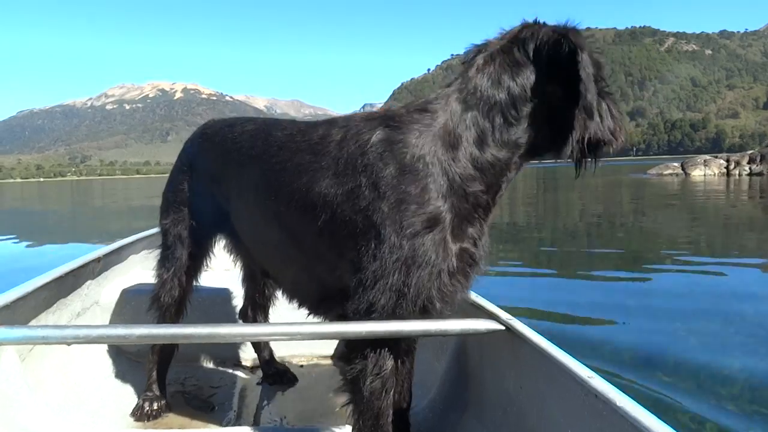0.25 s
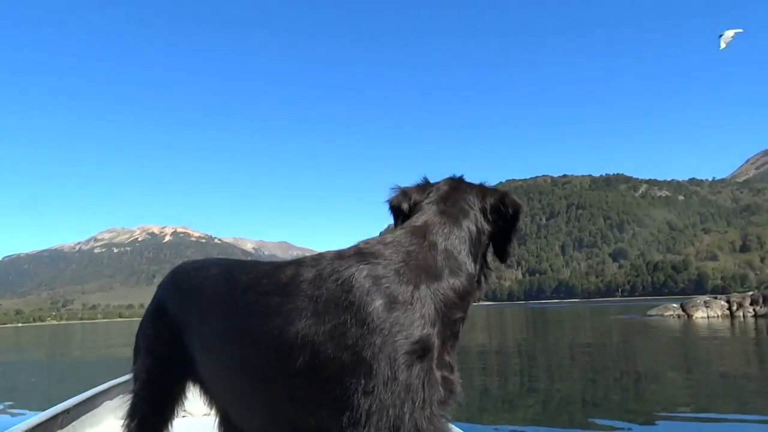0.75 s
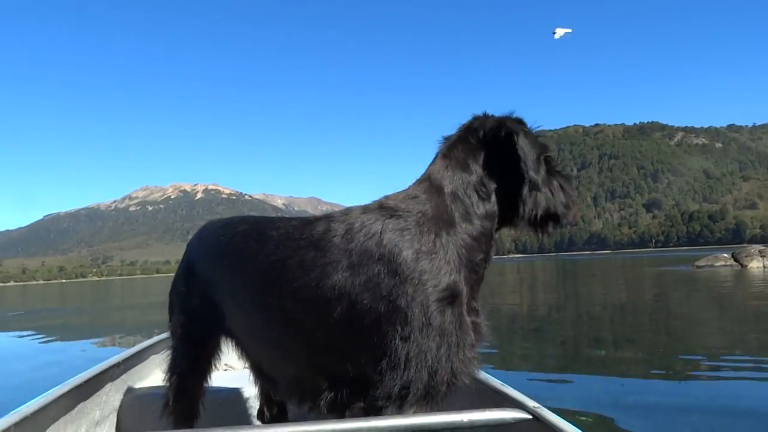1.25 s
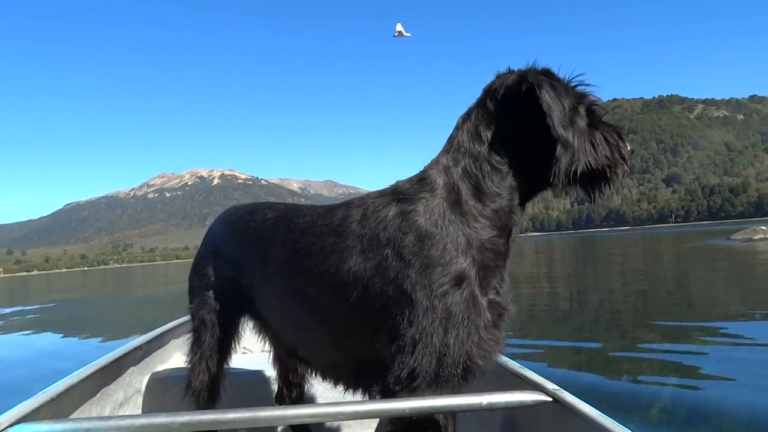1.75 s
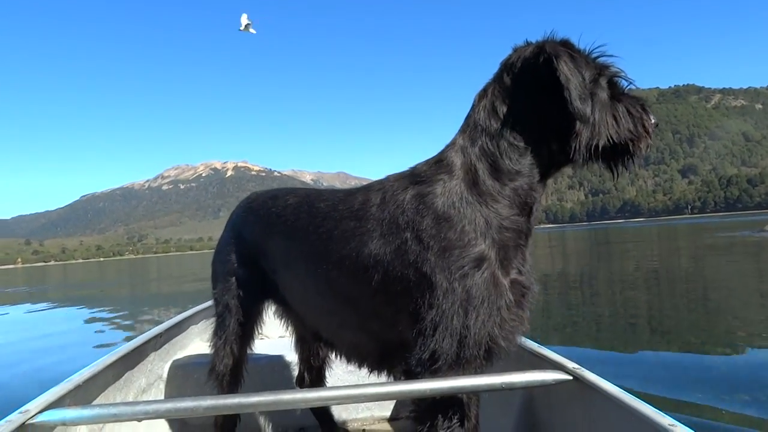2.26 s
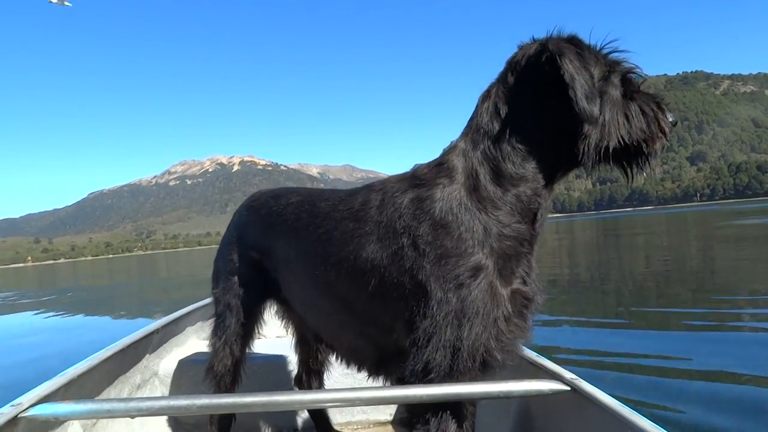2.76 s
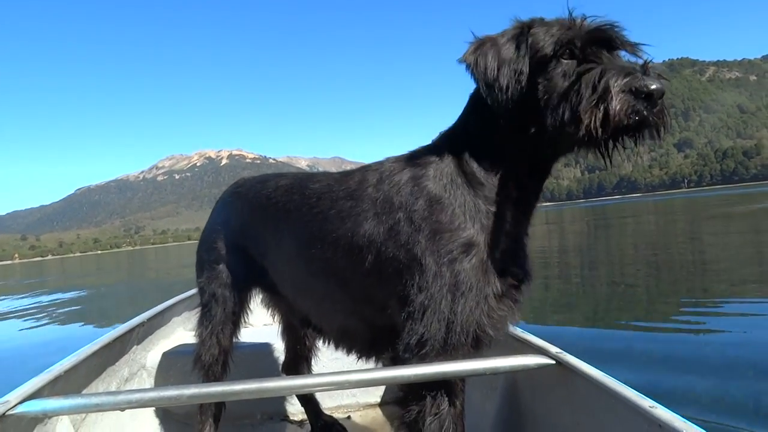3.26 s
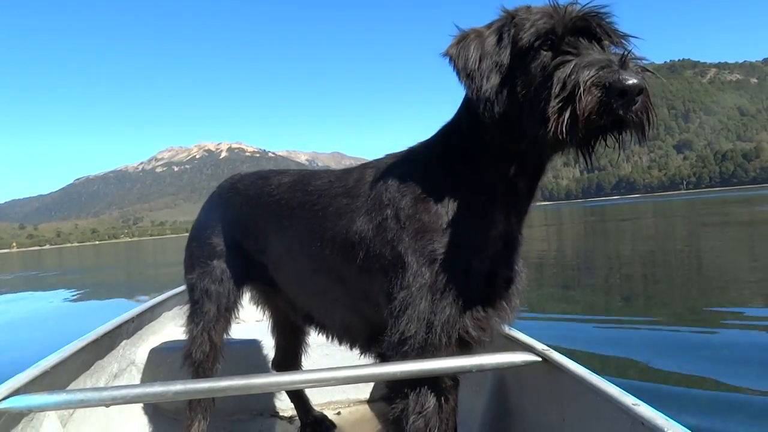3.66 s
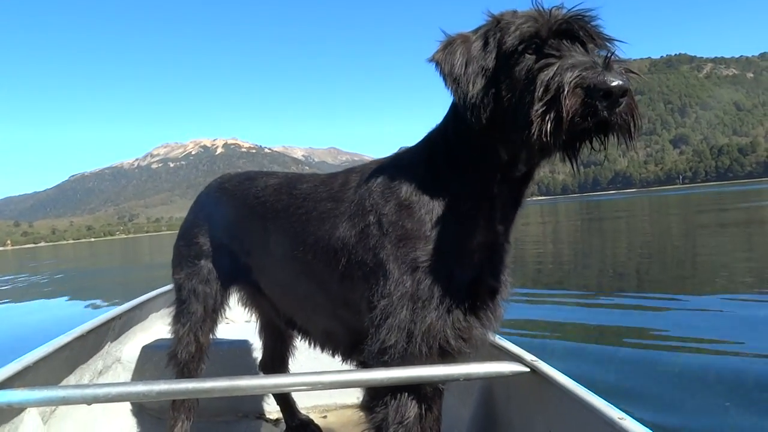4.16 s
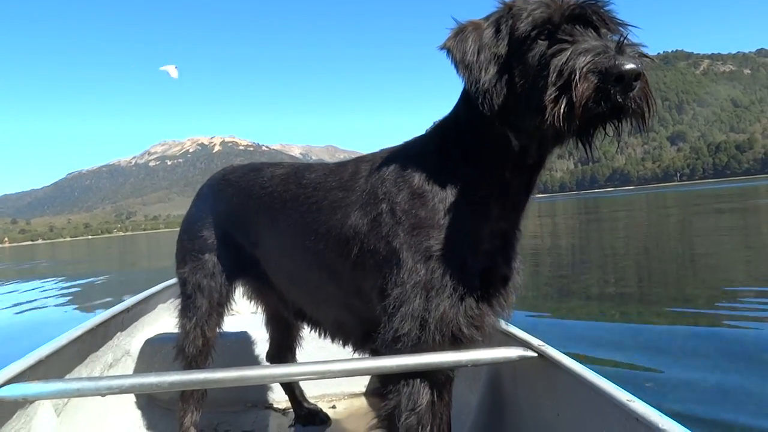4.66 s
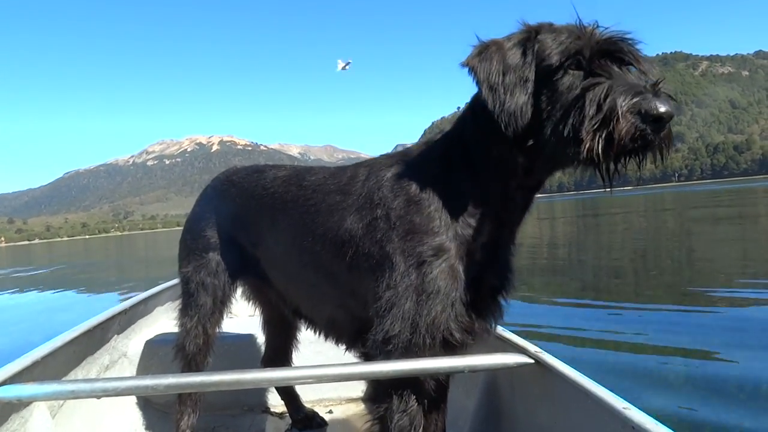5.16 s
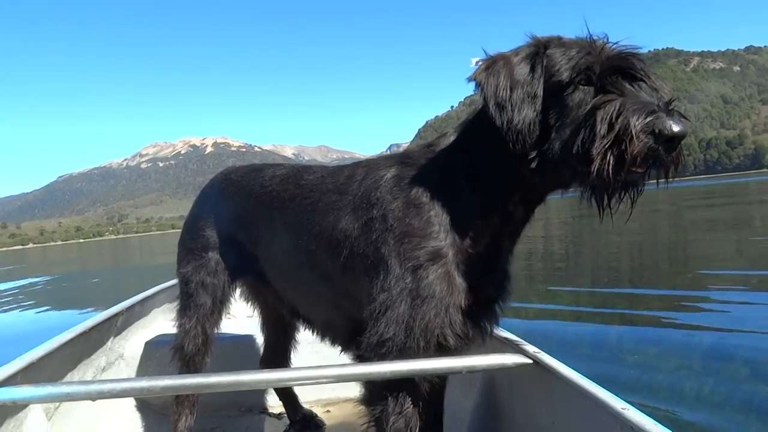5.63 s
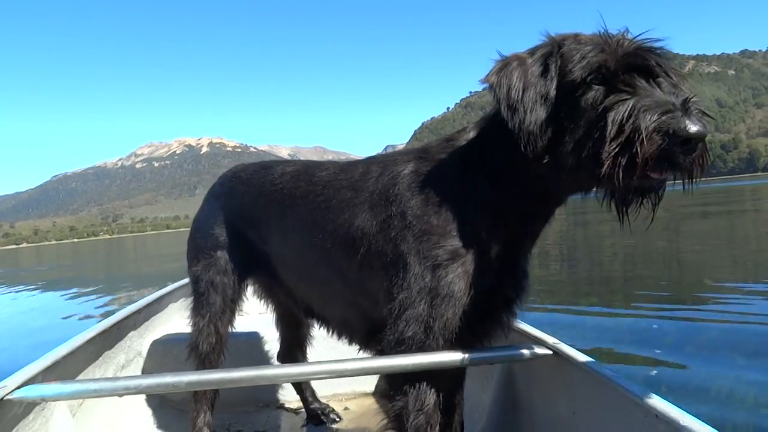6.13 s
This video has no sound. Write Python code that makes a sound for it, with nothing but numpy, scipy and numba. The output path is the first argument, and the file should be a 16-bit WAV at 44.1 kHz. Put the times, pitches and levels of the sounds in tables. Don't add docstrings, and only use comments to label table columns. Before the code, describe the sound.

Repeated squeaks of a rubbing metal oarlock on a calm lake, thin gliding whistles between them, oars splashing and dripping, metal ticking close by.

```python
import sys
import numpy as np
from scipy import signal
from scipy.fft import rfft, irfft
from scipy.io import wavfile
from scipy.ndimage import uniform_filter1d
from numba import njit

SR = 44100
rng = np.random.default_rng(int(sys.argv[2]) if len(sys.argv) > 2 else 0)


def ratio_of_db(decibels):
    return 10 ** (np.asarray(decibels, float) / 20)


def transcribe(signal):
    frames = np.atleast_2d(signal).T
    limited = np.clip(frames, -1, 1)
    pcm = np.round(limited * 32767).astype(np.int16)
    wavfile.write(sys.argv[1], SR, pcm)


N = 281799
T = np.arange(N) / SR
SIDES = np.array([[1], [-1]])

# frequency in Hz, density in dB per Hz.
AIR_SPECTRUM = [(20, -9), (65, 6.5), (95, 2), (140, 5), (400, -3.5), (1200, -12.5), (10000, -32),
                (15500, -65)]
# time in seconds, level in dB.
INSECT_LEVEL = [(0, -44.5), (.5, -53), (.7, -84), (5.45, -63), (5.7, -46), (6.39, -48)]

# start in seconds, end in seconds, lapping in dB, splashing in dB.
WASHES = [(0.162, 0.379, -52, -46), (0.452, 0.491, -44.5, -45), (0.561, 0.636, -48.5, -45),
          (1.127, 1.165, -51.5, -40.5), (1.243, 1.328, -60, -66), (2.002, 2.051, -56.5, -55.5),
          (2.73, 2.772, -72, -48.5), (2.83, 3.297, -45, -43), (2.922, 3.08, -42, -39.5),
          (3.277, 3.566, -52, -55), (4.454, 4.812, -47.5, -39), (4.542, 4.636, -40.5, -39.5),
          (4.876, 5.113, -40, -40.5), (5.107, 5.259, -56, -47), (5.534, 5.786, -56.5, -57),
          (5.835, 6.4, -50.5, -47), (5.841, 5.856, -48, -37.5), (5.934, 6.15, -49, -44.5)]
# start in seconds, end in seconds, level in dB.
SPRAY_BURSTS = [(0, 0.15, -46), (0.13, 0.39, -47.5), (.44, 0.63, -48), (1.139, 1.16, -44.5),
                (1.283, 1.322, -47), (1.69, 1.91, -53), (2.038, 1.994, -20), (1.99, 2.21, -47.5),
                (2.26, 2.63, -49.5), (2.722, 2.94, -49), (3.163, 3.424, -39.5), (4.083, 4.28, -51),
                (4.48, 5.04, -41.5), (5.07, 5.05, -30), (5.6, 5.78, -49), (5.8, 6.5, -42)]
# lapping, splashing and spray in dB.
CALM_DB = [-63, -61.5, -62.5]
# frequency in Hz, density in dB per Hz.
SPRAY_SPECTRUM = [(2400, -9), (3600, 1.5), (4800, 3), (7700, 8.5), (10300, 1.5), (12000, -16), (14000, -32)]

# time in seconds, peak in dB, centre in
# Hz.
TICKS = [(0.0591, -14.5, 2740), (0.4532, -29.5, 3440), (0.477, -29, 3500), (0.6213, -32.5, 2760),
         (0.7125, -23, 3710), (1.1397, -26.5, 3680), (1.4535, -20, 3900), (1.9784, -34, 6400),
         (1.9864, -29, 6600), (4.66, -25, 2600), (3.8287, -24, 6730), (4.0611, -35, 3850),
         (4.4215, -23, 7860), (4.5464, -26, 2050), (4.756, -20, 5870), (5.025, -22.5, 6570),
         (1.1099, -33, 2200), (1.16, -31, 1800), (5.2425, -22.5, 7100), (5.7516, -16.5, 4090),
         (5.8388, -25, 1195), (5.367, -38, 2960), (5.134, -32, 8640), (5.068, -22, 7550),
         (1.467, -42, 2420)]
# time in seconds, peak in dB, centre in Hz.
KNOCKS = [(0.239, -20.5, 836), (0.537, -32, 1003), (0.835, -34.5, 1040), (0.928, -32, 1560),
          (0.953, -30, 1240), (0.981, -33, 670), (3.825, -29, 930), (.31, -32.5, 775), (6.251, -26, 1750),
          (.465, -33, 890)]
# time in seconds, peak in dB, centre in Hz.
SHARP_TICKS = [(5.4, -21, 8600), (5.8611, -21, 7000), (2.7327, -33, 6000), (2.776, -33, 8500), (2.6, -34, 8500),
               (2.688, -37, 7200), (4.5326, -27, 9900), (4.6433, -21, 5940), (4.2, -29, 6800), (4.109, -38, 9500),
               (3.907, -37, 7300), (3.859, -40, 2700), (6.06, -26, 8300), (5.1647, -17, 8500),
               (3.1887, -14, 8000), (2.6474, -29, 7000), (5.9484, -17, 7500)]

# time in seconds, slip rate in Hz, effort in dB.
PULLS = [
    [(.188, 2052, -21.5), (.212, 2080, -20.5), (.238, 2127, -19), (.272, 2110, -21.5), (.302, 2004, -27),
     (.318, 2073, -40)],
    [(2.335, 2005, -35), (2.352, 2080, -33), (2.39, 2130, -25), (2.423, 2141, -21.5), (2.471, 2028, -33),
     (2.495, 1907, -41.5)],
    [(3.57, 2022, -32.5), (3.61, 2068, -25.5), (3.655, 2085, -21), (3.702, 2005, -26.5),
     (3.725, 1964, -38.5)],
    [(4.187, 2000, -33), (4.211, 2101, -24), (4.265, 2120, -20.5), (4.318, 2118, -18.5), (4.345, 1960, -42)],
    [(5.388, 1940, -34.5), (5.404, 2036, -27.5), (5.44, 2016, -24), (5.47, 2053, -21.5), (5.505, 2044, -23),
     (5.534, 1980, -23), (5.56, 1888, -30)],
]
# time in seconds, slip rate in Hz, effort in dB.
RETURNS = [
    [(.87, 2086, -35), (.917, 2072, -29), (.945, 2082, -25.5), (.978, 2059, -27), (1.005, 1915, -37)],
    [(1.58, 2143, -30), (1.615, 2158, -28.5), (1.656, 2130, -28.5), (1.697, 2014, -34.5),
     (1.718, 1942, -36)],
    [(2.964, 2130, -23.5), (2.995, 2087, -25.5), (3.022, 2067, -22.5), (3.06, 2053, -21.5),
     (3.097, 1990, -24), (3.13, 1860, -32)],
    [(4.808, 2100, -22.5), (4.835, 2150, -18.5), (4.865, 2117, -20), (4.9, 2044, -23), (4.939, 1983, -27.5),
     (4.972, 1866, -34)],
    [(5.958, 2086, -26), (5.983, 2003, -32), (6.008, 1855, -48)],
    [(6.112, 2068, -34.5), (6.128, 2072, -27.5), (6.143, 2054, -27.5), (6.175, 1780, -45)],
]
# partials 2, 3 and 4 in dB at full effort.
SEATING = [(-33, -32.5, -44), (-28.5, -26.5, -39), (-23.5, -33.5, -42), (-22.5, -28.5, -42),
           (-28, -30, -36.5), (-31.5, -37, -49), (-30, -33, -39.5), (-31, -34.5, -42), (-28, -30, -41),
           (-28.5, -32, -37), (-31.5, -37, -45)]
EFFORT_SHARE = [1, 0.62, 0.41]
# frequency in Hz, gain in dB.
HORN = [(3800, 6), (4150, 3.5), (4350, -5.5), (5800, 7), (6450, 6), (7900, 10), (8500, 8)]
# time in seconds, depth in dB, jolt as a ratio near 0 to 1.
SLIPS = [(.176, -20, 1), (.2155, -7, 0.8), (0.233, -5, 0.73), (0.255, -2, 0.67), (0.275, -1.5, 0.94),
         (.307, -10, 0.7), (.862, -1.5, 0.7), (.891, -2.5, 0.6), (.908, -6, 0.96), (0.9337, -3, 1.),
         (.9591, -5.5, 0.97), (.981, -3.5, 0.9), (1.579, -4, 1.2), (1.594, -2.5, .3), (1.619, -6, 0.66),
         (1.642, -6, 0.6), (1.661, -29, 0.66), (1.6898, -28, 0.54), (1.713, 0.5, 0.27), (2.337, -0.5, 1),
         (2.365, 1, 0.46), (2.3798, -3, 1.), (2.396, -3.5, 0.64), (2.422, -15, 1.02), (2.45, 2, 0.5),
         (2.4638, -9, 1), (2.963, -5, 1), (2.999, 0, .4), (3.0213, -7, .9), (3.0447, -8, 0.94),
         (3.066, -6, 1.1), (3.107, -4.5, 0.84), (3.571, -1, 1), (3.5996, -4.5, 1.), (3.63, -3.5, 0.56),
         (3.656, -5.5, 0.83), (3.699, -10, 1), (4.188, 4, 1), (4.224, 1.5, 0.1), (4.24, -5, 0.97),
         (4.2677, -5, 0.74), (4.2946, -5, 0.64), (4.319, -5.5, .8), (4.805, -4, 0.95), (4.842, -0.5, 0.55),
         (4.861, -3, 0.44), (4.884, -5, 0.85), (4.909, 2, .4), (4.921, -6, .6), (4.945, -3, 0.5),
         (4.956, -0.5, 0.45), (5.389, 4, 0.84), (5.481, -4.5, 1.22), (5.53, -9, 0.9), (5.986, -2, 0.65),
         (6.125, -6, 0.84), (6.153, -5.5, 0.6)]
# start in seconds, end in seconds, pitch at start in Hz, pitch at end in Hz, level in dB.
CHATTER = [(0.153, 0.178, 1003, 1152, -44.5), (0.173, 0.188, 1030, 1046, -43.5),
           (0.32, 0.351, 1080, 934, -47.5), (0.836, 0.871, 1017, 1090, -49),
           (1.017, 1.028, 1000, 1110, -52), (1.55, 1.583, 1060, 1188, -44.5),
           (1.732, 1.742, 1170, 1160, -52.5), (2.325, 2.334, 970, 990, -53.5),
           (2.943, 2.964, 1026, 1124, -40), (3.139, 3.156, 1100, 1150, -52),
           (3.551, 3.571, 988, 1203, -48.5), (4.179, 4.188, 1000, 1010, -56),
           (4.785, 4.806, 995, 1124, -41.5), (5.38, 5.387, 940, 948, -55.5),
           (5.946, 5.963, 1000, 1030, -49)]
CHATTER_PARTIALS_DB = [-1.5, 18, 12.5, 3.5, 4, 6.5, 8.5, 6, -6]
# time in seconds, left minus right in dB.
SQUEAK_PAN = [(.25, -3.5), (.93, -4), (1.65, -1.5), (2.42, 1), (3.05, 2.5), (3.65, 3), (4.27, 4.5),
              (4.88, 4), (5.47, 3), (6.1, 1.2)]

# start in seconds, end in seconds, level in dB.
BRUSH = [(.45, .62, -61.5), (1.12, 1.17, -62), (1.28, 1.33, -59), (1.7, 1.85, -54), (1.98, 2.25, -60),
         (2.55, 2.95, -67), (3.17, 3.45, -52), (4.45, 5.25, -64), (5.75, 6.39, -55)]
# time in seconds, pitch in Hz, level in dB.
WHISTLES = [
    [(.99, 4380, -46), (1.04, 4550, -46), (1.08, 4450, -44.5), (1.16, 3950, -38), (1.24, 3530, -37),
     (1.3, 3120, -46), (1.32, 2900, -66)],
    [(2.222, 2630, -56), (2.25, 3740, -39.5), (2.32, 4360, -42.5), (2.42, 4245, -36), (2.5, 3760, -36.5),
     (2.575, 3260, -44), (2.61, 2470, -55)],
    [(3.332, 3700, -38.5), (3.38, 4130, -33), (3.43, 4500, -46), (3.48, 4380, -39.5), (3.55, 3900, -35.5),
     (3.65, 3430, -44), (3.71, 3110, -57)],
    [(3.39, 4150, -49), (3.43, 4185, -37.5), (3.46, 4200, -46)],
    [(3.43, 2920, -53), (3.48, 2890, -50), (3.56, 2600, -56)],
    [(4.57, 3860, -40.5), (4.62, 4170, -53), (4.68, 4400, -51), (4.74, 4060, -49), (4.8, 3760, -42),
     (4.88, 3280, -49)],
    [(5.87, 3800, -42), (5.93, 4200, -47), (5.96, 4390, -49), (6.04, 3820, -42)],
]
# time in seconds, peak in dB.
CLINKS = [
    (2.008, -34),
    (2.047, -29.5),
    (3.907, -42),
    (4.131, -41),
    (5.1635, -7.5),
    (5.233, -34),
    (5.2405, -15),
    (5.2445, -23),
]
# frequency in Hz, level in dB, 60 dB decay time in seconds.
TAG_MODES = [(5930, -5, .11), (5992, -6, .085), (6331, -9, .016), (5582, -17, .015), (6600, -15, .012),
             (7515, -14, .016), (8236, -16, .016), (5254, -19, .014)]
# start in seconds, end in seconds, level in dB.
DRAGS = [
    (2.01, 2.25, -52),
    (3.17, 3.47, -47),
    (5.28, 5.35, -57),
    (6.31, 6.39, -49),
]

# time in seconds, pitch in Hz, peak in dB.
DRIPS = [(2.706, 1910, -40), (2.727, 2140, -31), (2.774, 1770, -32), (2.85, 1310, -33), (2.912, 1050, -32),
         (2.955, 1156, -24), (3.103, 580, -27), (3.145, 2450, -26), (3.197, 448, -33), (3.244, 1310, -29),
         (3.256, 276, -31), (4.476, 1470, -25), (4.545, 2570, -23), (4.545, 580, -29), (4.585, 646, -22.5),
         (4.602, 905, -25), (4.618, 1910, -21.5), (4.716, 1590, -17), (4.726, 1254, -22.5),
         (4.748, 1820, -22.5), (4.798, 1150, -25), (4.929, 198, -31.5), (5.05, 190, -29), (5.1, 212, -39),
         (5.036, 290, -18), (2.519, 2250, -32), (2.557, 1380, -40), (4.95, 454, -27), (4.973, 407, -26.5),
         (4.976, 1580, -21.5), (5.024, 1120, -31), (5.062, 1070, -24), (5.083, 1110, -21.5),
         (5.112, 806, -28.5), (5.192, 3300, -31)]
# start in seconds, length in seconds, pitch at start in Hz, pitch at end in Hz, peak in dB.
GURGLES = [(2.815, 0.049, 568, 584, -35), (2.816, 0.28, 320.8, 308, -40), (2.951, 0.052, 544, 564, -30.5),
           (2.953, 0.09, 302, 306, -37), (3.248, 0.047, 927, 880, -38), (4.41, 0.049, 327, 478, -30.5),
           (4.476, 0.021, 497, 440, -34.5), (4.508, 0.035, 427, 340, -35), (4.57, 0.068, 304, 371, -32.5),
           (4.644, 0.03, 850, 897, -39.5), (4.652, 0.094, 122, 205, -39), (4.751, 0.099, 231, 295, -41.5),
           (4.831, 0.06, 155, 292, -35.5), (5.863, 0.05, 698, 550, -38), (5.887, 0.039, 406, 520, -35.5),
           (5.986, 0.017, 470, 457, -27.5), (6.193, 0.027, 903, 990, -39.5)]


def level(x, db):
    return x * ratio_of_db(db) / np.sqrt(np.mean(x ** 2))


def noise(shape):
    hz, db = np.transpose(shape)
    f = np.maximum(np.fft.rfftfreq(N + 1, 1 / SR), 1)
    gain = ratio_of_db(np.interp(np.log(f), np.log(hz), db, -90, -90))
    return level(irfft(rfft(rng.standard_normal(N + 1)) * gain)[:N], 0)


def walk(rate):
    hold = int(SR / rate)
    steps = np.repeat(rng.standard_normal(N // hold + 1), hold)
    return 1.01 * uniform_filter1d(uniform_filter1d(steps, hold), hold)[:N]


def place(x, pan_db):
    return x * ratio_of_db(np.array([pan_db, -pan_db]).reshape(2, -1) / 2)


def surge(rows, calm_db):
    rise_db_per_s, fall_db_per_s, long_s = 684, 618, 0.22
    power = ratio_of_db(2 * calm_db)
    for start, end, db in rows:
        slow = 1 + ((end - start) / long_s) ** 2
        away_db = rise_db_per_s * np.maximum(start - T, 0) + fall_db_per_s * np.maximum(T - end, 0)
        power = power + ratio_of_db(2 * (db - away_db / slow))
    return 10 * np.log10(power)


@njit
def rings(start, hz, t60, glide, size, push, n):
    out = np.zeros(n)
    for k in range(len(hz)):
        life, turn = t60[k] * SR, 0.
        for i in range(min(int(life), n - start[k])):
            turn += 2 * np.pi * hz[k] * (1 + glide[k] * i / life) / SR
            decay = 10 ** (-3 * i / life)
            out[start[k] + i] += size[k] * np.sin(turn) * decay * (1 - np.exp(-i / push))
    return out


def tone(s, hz, dbs, bend=1., edge_s=.003, flutter_db=0., duck_db=0.):
    out, on = np.zeros(N), slice(int(s[0] * SR), int(s[-1] * SR))
    t = T[on]
    pitch = np.interp(t, s, hz) * (bend * np.ones(N))[on]
    turn = 2 * np.pi * np.cumsum(pitch) / SR
    duck = (duck_db * np.ones(N))[on]
    knots = t[::SR // 150]
    for k, db in enumerate(dbs):
        flutter = np.interp(t, knots, rng.standard_normal(len(knots)))
        gain = ratio_of_db(np.interp(t, s, db) + flutter_db * flutter + duck * (1 + k / 3))
        out[on] += np.sqrt(2) * gain * -np.cos((k + 1) * turn + .4 * k)
    edge = np.clip(np.minimum(t - s[0], s[-1] - t) / edge_s, 0, 1)
    out[on] *= np.sin(np.pi / 2 * edge) ** 2
    return out


def still_air():
    return ratio_of_db(-59.5) * (noise(AIR_SPECTRUM) + noise(AIR_SPECTRUM) * SIDES * ratio_of_db(-24))


def insects():
    upper = noise([(7600, -26), (8750, -7), (10200, -26)])
    lower = noise([(3900, -12), (4500, -7), (5300, -16)])
    return (upper + ratio_of_db(-6) * lower) * ratio_of_db(np.interp(T, *np.transpose(INSECT_LEVEL)) + walk(86))


def bubbles(lo_hz, hi_hz, cycles, scatter_db, count):
    when, pitch, strength, life = rng.random((count, 4)).T
    hz = lo_hz * (hi_hz / lo_hz) ** pitch
    size = ratio_of_db(scatter_db * np.minimum(-np.log(1 - strength), np.pi))
    start = (when * N).astype(np.int64)
    push = 16000 / np.sqrt(lo_hz * hi_hz)
    return level(rings(start, hz, cycles * (.5 + life) / hz, 1.1 * life ** 2, size, push, N), 0)


def lapping():
    wash = noise([(110, -41), (200, -24.5), (400, -6.5), (900, -16.0), (1300, -67)])
    return bubbles(211, 950, 18, 3.5, count=1300) + 0.98 * wash


def splashing():
    wash = noise([(700, -44), (1000, 6.5), (2500, 16.0), (4200, -1), (5000, -21)])
    return bubbles(750, 3700, 24, 3.7, count=2600) + 0.5 * wash


def spray():
    return .3 * bubbles(4000, 9500, 9, 5.5, count=2500) + noise(SPRAY_SPECTRUM) * ratio_of_db(2.4 * walk(250) - 1)


def water():
    rows = np.array(WASHES)
    lap_db, splash_db, spray_db = map(surge, (rows[:, :3], rows[:, [0, 1, 3]], SPRAY_BURSTS), CALM_DB)
    layers = ((lapping, lap_db, -21, .2), (splashing, splash_db, -13, 3.0), (spray, spray_db, -17, .4))
    out = 0
    for layer, db, side_db, pan_db in layers:
        swell = ratio_of_db(db + 2.0 * walk(30) + 1.63 * walk(8))
        out = out + swell * (place(layer(), pan_db) + ratio_of_db(side_db) * layer() * SIDES)
    return signal.sosfilt(signal.butter(3, 130, "high", fs=SR, output="sos"), out)


def knocks(table, width, cycles, rattle_s, count, floor_hz=500):
    s, db, hz = np.repeat(table, count, axis=0).T
    detune, damping, delay = rng.standard_normal((len(s), 3)).T
    start = ((s + rattle_s * delay ** 2) * SR).astype(np.int64)
    hz = hz * 2 ** (width * detune)
    heard = np.sign(damping) * (hz < .27 * SR) * (hz > floor_hz)
    heard = heard * 2 ** (width * detune / 2)
    t60 = cycles * 2 ** (.4 * damping + width * np.minimum(detune, 0) / 2) / hz
    return rings(start, hz, t60, 0 * s, 2 * ratio_of_db(db) / np.sqrt(count) * heard, 3., N)


def partials(rows, seating):
    s, hz, effort_db = np.transpose(rows)
    t = np.unique(np.r_[s, (s[1:] + s[:-1]) / 2])
    hz, effort_db = np.interp(t, s, hz), np.interp(t, s, effort_db)
    swing_db = effort_db - effort_db.max()
    upper = [db + share * swing_db + np.interp(k * hz, *np.transpose(HORN))
             for k, db, share in zip((2, 3, 4), seating, EFFORT_SHARE)]
    return t, hz, effort_db, *upper


def grip_loss():
    dip_db, swing, scrape = np.zeros(N), np.zeros(N), np.zeros(N)
    for s, db, jolt in SLIPS:
        near = slice(int(s * SR) - SR // 50, int(s * SR) + SR // 50)
        t = T[near] - s
        dip_db[near] += 2.04 * min(db, 0) * np.exp(-(t / 0.0015) ** 2)
        snap = 0.0304 * np.exp(-((t - 0.0016) / 0.00129) ** 2)
        sag = 0.0501 * np.exp(-((t + 0.0011) / 0.00199) ** 2)
        swing[near] += jolt * (snap - sag)
        scrape[near] += jolt ** 2 * np.exp(-(np.minimum(t, 0) / 0.001) ** 2 - np.maximum(t, 0) / 0.0045)
    return dip_db, swing, scrape


def chatter(dip_db, shaky):
    out = 0
    for t0, t1, hz0, hz1, db in CHATTER:
        rising = hz1 > hz0
        swell = np.array([db - 8.5, db, db]) if rising else np.array([db, db - 6.5, db - 12])
        dbs = [swell + d - k * (db < -51) * 2 for k, d in enumerate(CHATTER_PARTIALS_DB)]
        last_hz = 1.19 ** rising * hz1
        times = [t0, .25 * t0 + .75 * t1, t1]
        out = out + tone(times, [hz0, hz1, last_hz], dbs, shaky, .003, flutter_db=4.5, duck_db=dip_db)
    return out


def oarlock():
    dip_db, swing, scrape = grip_loss()
    bend = 1 + swing + 0.0027 * walk(150) + 0.0031 * walk(900)
    shaky = 1 + .012 * walk(330) + .012 * walk(1200)
    squeal = 0
    for s, hz, *db in map(partials, PULLS + RETURNS, SEATING):
        dbs = db + [db[3] - 9, db[2] - 26, db[3] - 34]
        squeal = squeal + tone(s, hz, dbs, bend, .0035, flutter_db=1.8, duck_db=dip_db)
        fade = np.array([db[0][-1] - 2.0, db[0][-1] - 15])
        stutter = [fade - 22, fade - 2, fade - 22, fade - 14, fade - 18]
        half_hz = hz[-1] * np.array([.51, .5])
        squeal += tone([s[-1], s[-1] + 0.027], half_hz, stutter, shaky, flutter_db=6.0)
    squeal += chatter(dip_db, shaky)
    grip = np.sqrt(np.abs(uniform_filter1d(squeal ** 2, size=600)))
    grit = noise([(1700, 13), (2500, 15.0), (4500, 12.0), (6500, 15.0), (9500, 7.5), (12000, -25)])
    early_db = 6 * (T < .36) + 3 * (T > .8) * (T < 1.05)
    grind = ratio_of_db(-25.5 + early_db + 3 * walk(120))
    return squeal + grip * grit * (grind + ratio_of_db(-9) * scrape)


def brush():
    shape = [(9000, -12), (11000, -1), (13000, 1), (15700, 4)]
    swell = ratio_of_db(surge(BRUSH, -86) + 2.0 * walk(60) + 2.5 * walk(300))
    return swell * (place(noise(shape), 2.3) + ratio_of_db(-7) * noise(shape) * SIDES)


def rounded(rows):
    s, hz, db = np.transpose(rows)
    t = np.linspace(s[0], s[-1], SR // 1000)
    return t, uniform_filter1d(np.interp(t, s, hz), size=7, mode="nearest"), np.interp(t, s, db)


def whistles():
    bend = 1 + 0.00096 * walk(46)
    return sum(tone(s, hz, [db, db - 29], bend, 0.0022, flutter_db=2.0)
               for s, hz, db in map(rounded, WHISTLES))


def tag():
    s, db = np.repeat(CLINKS, len(TAG_MODES), axis=0).T
    hz, mode_db, t60 = np.tile(TAG_MODES, (len(CLINKS), 1)).T
    size = ratio_of_db(db + mode_db) * (-1.) ** np.arange(len(s))
    clinks = rings((s * SR).astype(np.int64), hz, t60, 0 * s, size, 5.0, N)
    drag = uniform_filter1d(sum(ratio_of_db(d) * (T > a) * (T < b) for a, b, d in DRAGS), size=600)
    hum = drag * noise([(5800, -28), (5950, -13), (6150, -26)])
    skid = ratio_of_db(surge([(5.215, 5.25, -38.5)], -90) + 2.7 * walk(300))
    skid = skid * noise([(4500, -12), (5500, 5), (6400, 1), (8000, -22)])
    return hum + skid + clinks


def drips():
    s, hz, db = np.transpose(DRIPS)
    return rings((s * SR).astype(np.int64), hz, 0.016 + 18 / hz, 0.24 + 0 * s, ratio_of_db(db + 1.0), 52.0, N)


def gurgles():
    bend = 1 + 0.029 * walk(60)
    out = 0
    for s, length, hz0, hz1, db in GURGLES:
        times = [s, s + .7 * length, s + 1.3 * length]
        pitch = [hz0, (hz0 + 2 * hz1) / 3, hz1]
        out = out + tone(times, pitch, [[db, db - 3, db - 16]], bend, .004, flutter_db=2.5)
    return out


def echo(x, t60, gap_s):
    t = T[:SR // 2]
    tail = rng.standard_normal((2, len(t))) * 10 ** (-3 * t / t60) * (t > gap_s)
    return signal.fftconvolve(x[None], tail / np.sqrt(np.sum(tail[0] ** 2)), axes=1)[:, :N]


def scene():
    pan_db = np.interp(T, *np.transpose(SQUEAK_PAN))
    hits = knocks(TICKS, .9, 30, .0006, count=40) + knocks(KNOCKS, .4, 10, .0004, count=8)
    hits = hits + tag() + knocks(SHARP_TICKS, .45, 26, .0008, count=20, floor_hz=2000)
    squeal = oarlock()
    core = signal.sosfiltfilt(signal.butter(4, 3100, fs=SR, output="sos"), squeal)
    near = place(core, pan_db) + place(squeal - core, 0.63 * pan_db) + place(hits, pan_db)
    near = near + brush() + place(whistles(), -5.0)
    near = near + place(drips(), 0.62 * pan_db) + place(gurgles(), 0.19 * pan_db)
    wet = echo(squeal + hits, 0.3, 0.012)
    wet = wet.mean(axis=0) + .5 * wet
    return near + ratio_of_db(-20.5) * wet + water() + still_air() + insects()


def band_limit(x):
    return signal.sosfilt(signal.butter(12, 15840, fs=SR, output="sos"), x)


def record(dry):
    dull_top = signal.butter(3, 11500, fs=SR, output="sos")
    bass_loss = signal.butter(2, 45, "high", fs=SR, output="sos")
    mix = signal.sosfilt(np.vstack([dull_top, bass_loss]), dry)
    return band_limit(mix)


dry = scene()
out = record(dry)
transcribe(out)
```